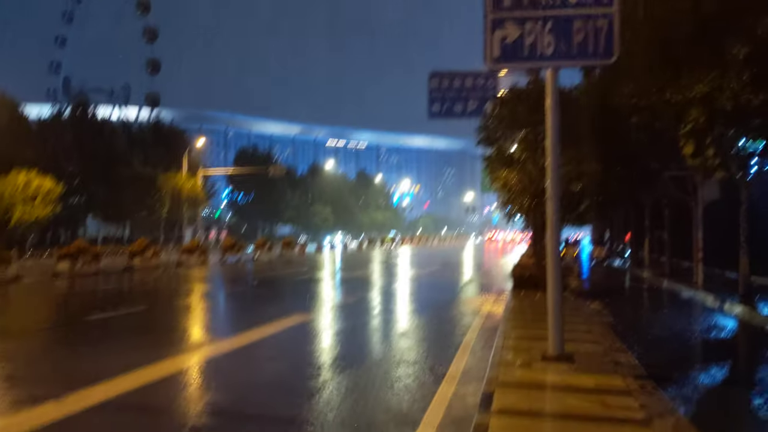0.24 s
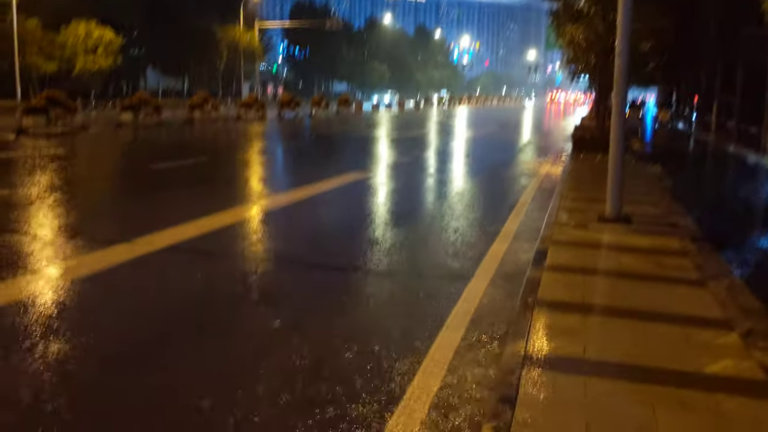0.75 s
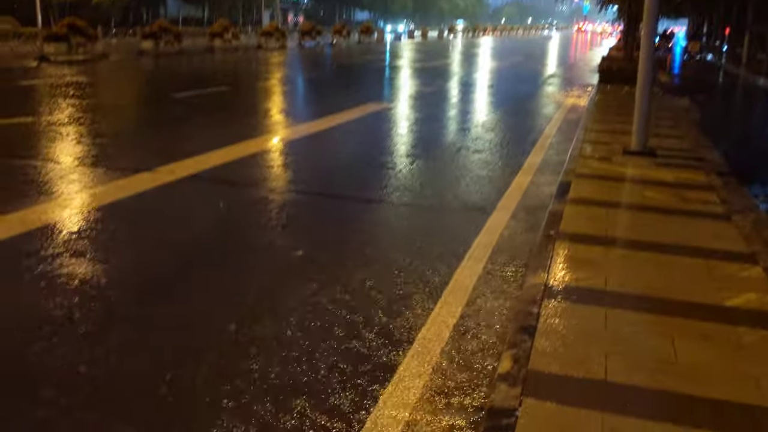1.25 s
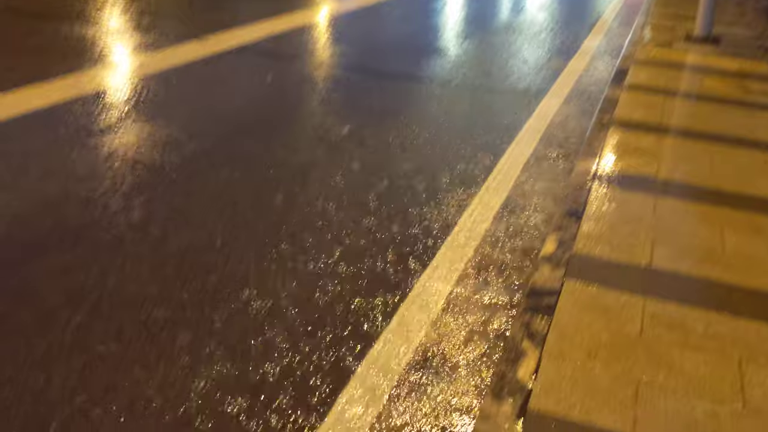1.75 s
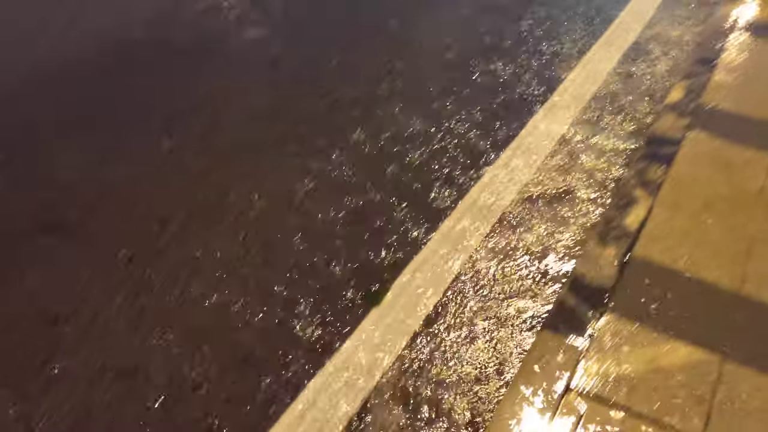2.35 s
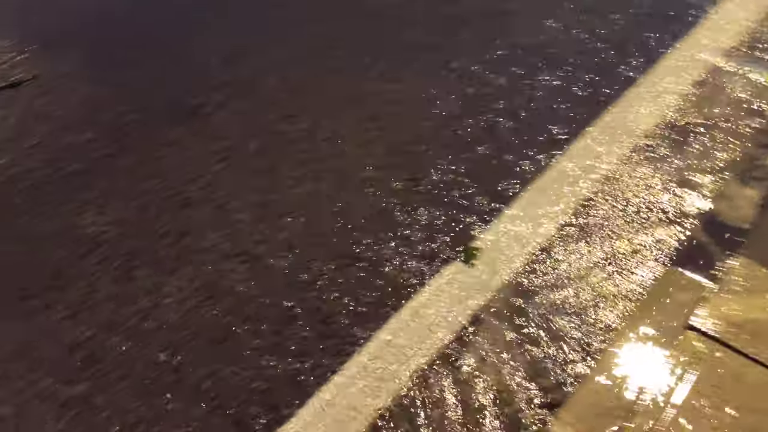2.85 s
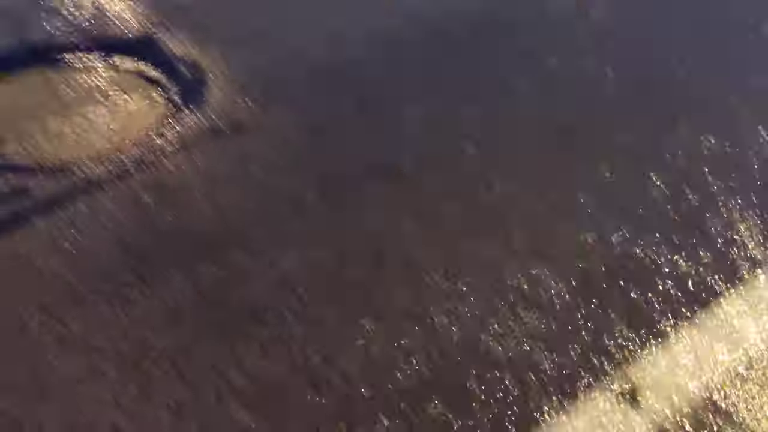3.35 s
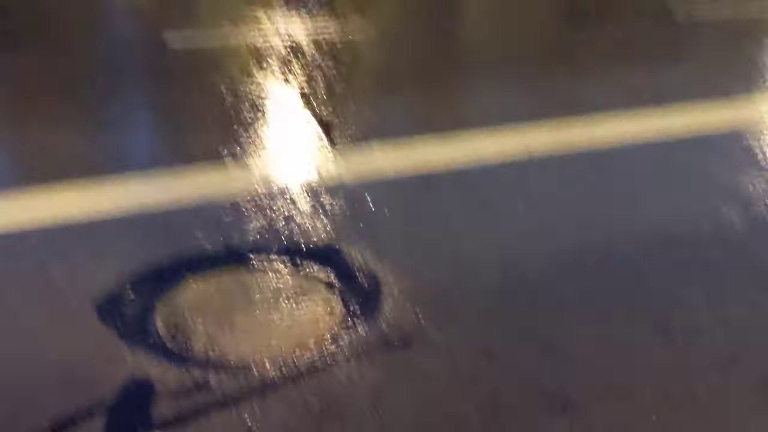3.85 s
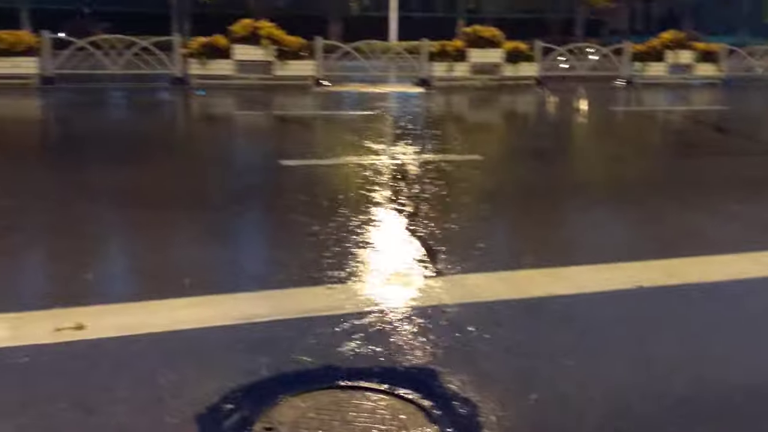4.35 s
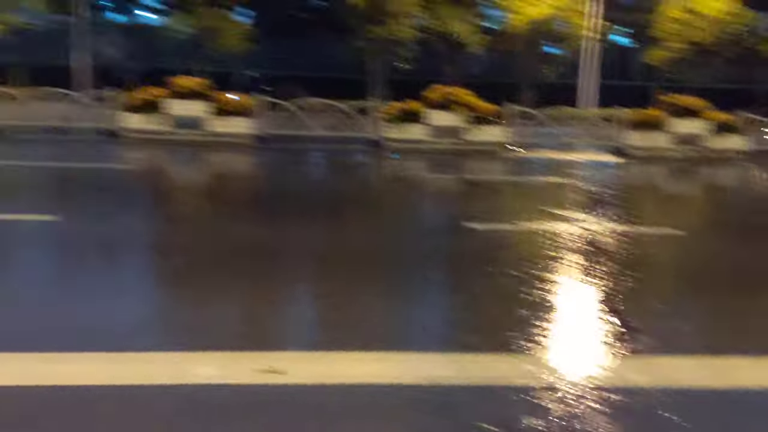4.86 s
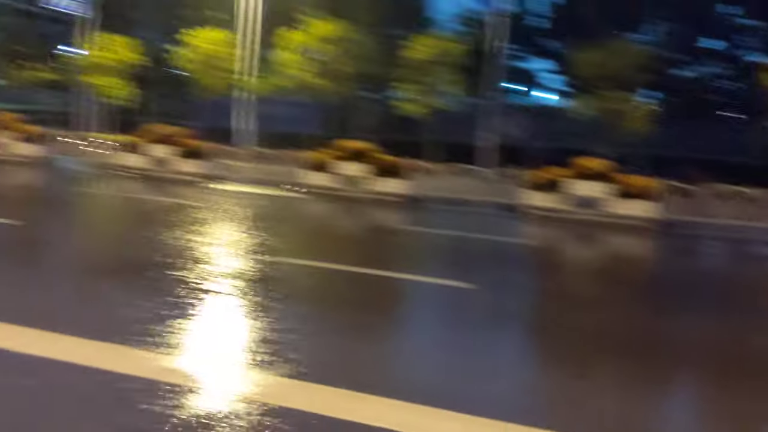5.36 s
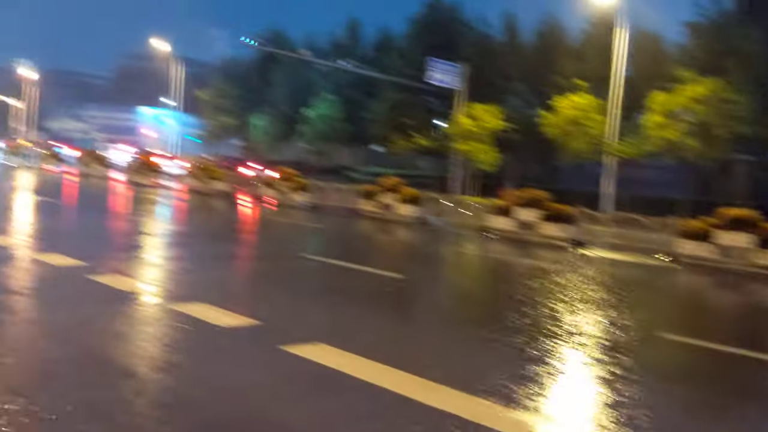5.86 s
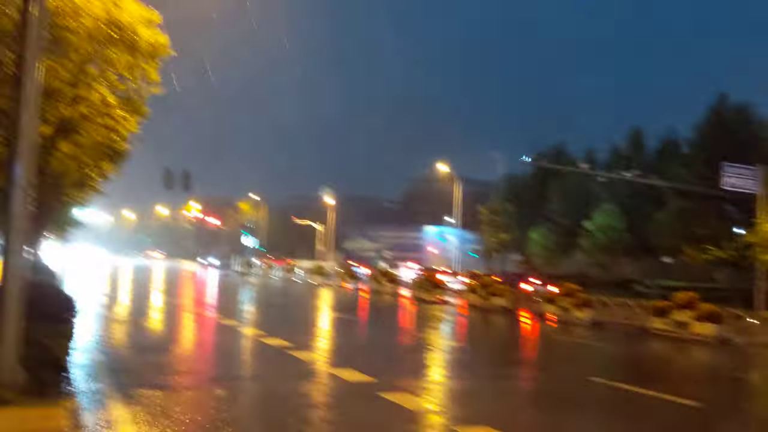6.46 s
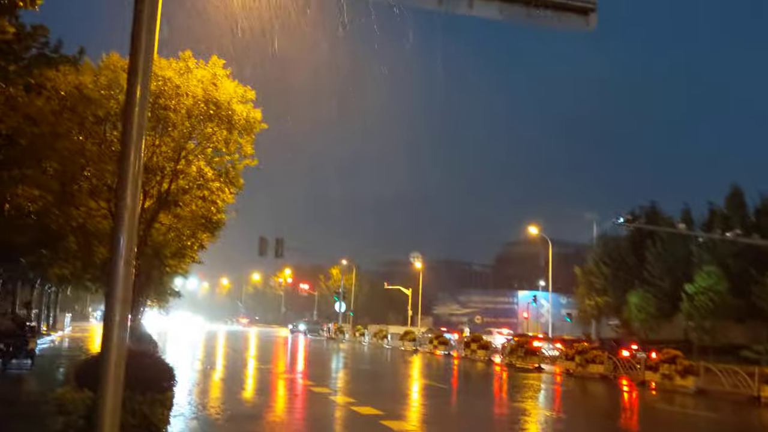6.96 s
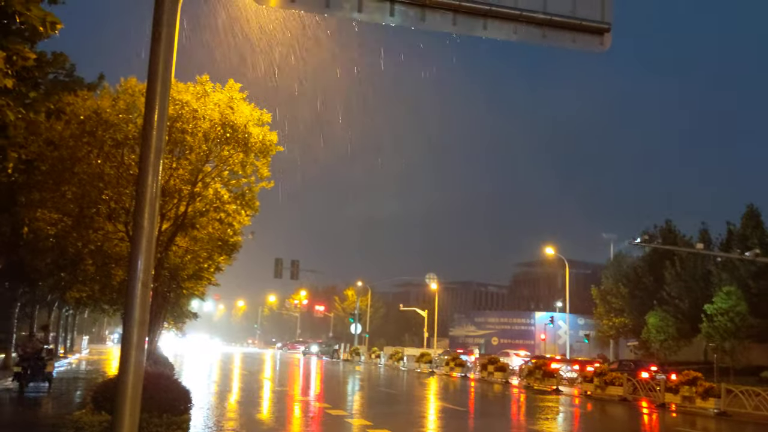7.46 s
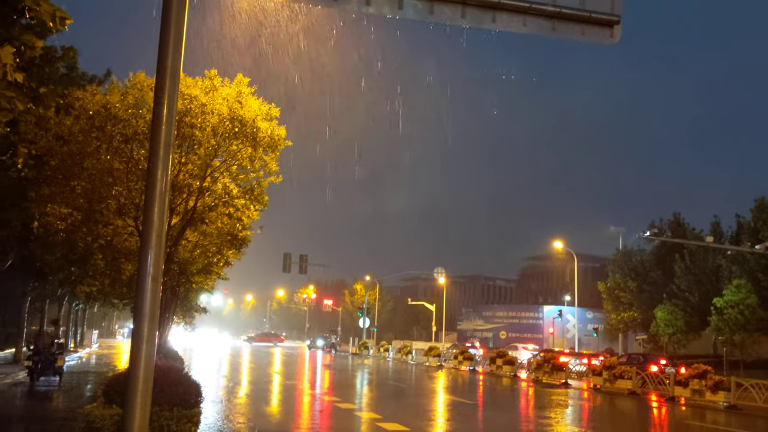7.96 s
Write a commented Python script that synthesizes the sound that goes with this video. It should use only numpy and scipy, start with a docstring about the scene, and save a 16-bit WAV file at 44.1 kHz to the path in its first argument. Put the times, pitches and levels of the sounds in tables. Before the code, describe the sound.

A steady downpour on asphalt, with a dull canopy-like patter and faint far traffic drone. Close drops tick, plop and crack left and right, sparse at first, then dense around three to four seconds. Lumpy low wind buffeting follows at five to six and a half seconds, with a few hard snaps, before calmer, stronger rain hiss. Small exposed stereo microphone, open street.

```python
"""Heavy rain on a wide city street at night, heard on a small two-port microphone, probably under an umbrella.
Countless filtered clicks and noise make the hiss on wet asphalt and the canopy patter; big drops snap
right beside the ports, each a strike, a splash back and a spray that ring a resonance.
Far off, shaped noise drones as traffic. Close in, lumpy low noise is gusts buffeting the microphone
as it swings round, and damped low swings are knocks on its case."""
import sys
import numpy as np
from scipy import signal
from scipy.fft import rfft, irfft, next_fast_len
from scipy.io import wavfile

SR = 44100
rng = np.random.default_rng(int(sys.argv[2]) if len(sys.argv) > 2 else 0)


def pcm_store(signal):
    """Save signal as 16-bit PCM."""
    levels = np.round(np.clip(np.atleast_2d(signal), -1, 1) * 32767)
    wavfile.write(sys.argv[1], SR, levels.astype(np.int16).T)


N = 362943

# Far rumble, probably traffic, that swells and fades:
# (time of the top [s], half-length [s], level before trim [dB])
TRAFFIC_SWELLS = [(.285, 0.029, -42), (0.59, 0.27, -42.5), (1.964, 0.34, -44.5)]
# Tyres of cars coming up the wet street: (time [s], level on the left [dB])
TYRE_LEVEL = [(0, -63), (6.8, -79), (7.7, -48), (8.23, -46.5)]
# Steady air on the ports, freshening as the microphone swings round: (time [s], level before trim [dB])
BREEZE_LEVEL = [(0, -47.5), (1.4, -53), (2.2, -51.5), (4.7, -50.5), (5.1, -44), (6.3, -41), (6.9, -39.5),
                (7.5, -43), (8.23, -42.5)]
# Gusts on the ports: (start of the hold [s], length of the hold [s], level [dB])
GUST_EVENTS = [(5.11, 0.024, -41), (5.188, 0.064, -40.5), (5.573, 0.011, -33), (5.661, 0.017, -35.5),
               (5.774, 0.0099, -38.5), (5.884, 0.061, -29.5), (5.997, 0.055, -28.5), (6.089, 0.047, -29.5),
               (6.186, 0.043, -34.5), (6.275, 0.054, -26), (6.367, 0.068, -25), (6.601, 0.073, -37.5),
               (6.734, 0.011, -33), (7.79, 0.033, -39.5)]
# Dull knocks on the microphone's case:
# (time [s], level before damping [dB], pitch [Hz], time to fall 60 dB [s], left minus right [dB])
CASE_KNOCKS = [(0.65, -20, 39.5, 0.058, 5), (3.7186, 5, 124, 0.01, -29), (3.718, -21, 48, 0.17, -2),
               (4.89, -11.5, 47.4, 0.049, -9), (5.659, -18, 33.4, 0.092, 2)]
# Rain as the microphone turns: (time [s], canopy patter before trim [dB],
# street hiss on the right before trim [dB], left hiss and bright fizzles before trim [dB])
RAIN_LEVELS = [(0.0, -50, -53, -57), (0.5, -45.5, -54, -57), (0.98, -49.5, -53.5, -57),
               (1.44, -49.5, -55, -57), (1.88, -47.5, -52.5, -55), (3.0, -49.5, -57.5, -58),
               (3.67, -48.5, -54.5, -57), (4.12, -48.5, -55.5, -55.5), (4.38, -48.5, -54.5, -57),
               (5.02, -49, -53.5, -55), (5.45, -48.5, -50.5, -51), (7.1, -49, -52, -52.5),
               (7.61, -48.5, -47.5, -48.5), (8.23, -48, -45, -52)]
# How thickly single drops fall near the microphone: (time [s], relative level [dB])
DRIP_LEVEL = [(0, -8), (1.5, 6), (3.3, 9.5), (4.7, 0), (6, -17), (7.3, -7), (8.23, 13)]
# Big close drops:
# (time [s], peak at the louder port [dB], pitch of the snap [Hz], ring Q, left minus right [dB])
CLOSE_DROPS = [(0.212, -22.5, 724, 4.5, 8), (0.6517, -12, 600, 0.53, 13), (.8773, -29, 600, 3.9, 1),
               (1.099, -22.5, 1310, 1.1, 3), (1.178, -15.5, 2830, 1.1, -1), (1.271, -21.5, 3300, 0.82, -2),
               (1.6902, -19, 6800, .7, 6), (1.7619, -16, 704, 0.84, 10), (1.918, -19, 5600, 1.3, 9),
               (2.1514, -25, 566, 2.4, 2), (2.2126, -14, 1280, .45, 8), (2.429, -20.5, 3570, 2.1, -1.5),
               (2.531, -11.5, 895, 0.43, -6), (2.5579, -11, 900, 2.6, 3), (2.613, -16, 900, 0.29, -1),
               (2.6716, -17, 600, 1.1, 7), (2.7217, -18.5, 895, 1.3, 2), (2.937, -19.5, 8900, 4.2, 27),
               (3.0997, -15, 700, 0.29, -11), (3.1178, -18.5, 1200, .4, 7), (3.1514, -15, 1900, 0.6, -3),
               (3.1748, -20, 755, 1.9, 6), (3.2153, -13.5, 700, 0.19, 4.5), (3.27, -18.5, 580, 2.6, 4),
               (3.371, -18, 760, 2.3, 3), (3.3906, -20.5, 850, 2.3, 5), (3.4506, -26, 8000, 1.8, 15),
               (3.53, -18, 825, 1.2, 10), (3.5621, -8, 716, 1.1, -0.5), (3.6635, -18.5, 4600, .7, 4),
               (3.689, -3.5, 1200, 0.41, 16), (3.717, -6, 860, 0.57, 0), (3.7197, -0.5, 830, 0.22, -15),
               (3.733, -13.5, 9500, 1.5, -25), (3.8005, -10.5, 2200, 0.21, -27), (3.81, -4.5, 930, 1.8, 14),
               (3.9132, -16, 8700, 3.3, 16), (3.9985, -4, 3070, 1.6, 24), (4.115, -12, 700, 0.23, -11),
               (4.2271, -17.5, 3330, 3.4, 16), (4.262, -24, 8000, 3.1, 15), (4.4289, -19, 800, 1.7, 5),
               (4.507, -14.5, 700, 0.4, -14), (5.025, -14, 1040, 1.7, -0.5), (5.098, -7.5, 700, 0.38, -5),
               (5.119, -7, 700, .3, -4.5), (5.4285, -4.5, 980, 2.2, 3), (5.4557, -11, 600, .65, -1.5),
               (5.6993, -16, 5100, 3.6, 0), (5.834, -16.5, 3880, 5.5, -13), (5.939, 2.5, 3930, 0.83, -21),
               (5.962, -19, 980, 1.4, 3), (5.969, -11, 950, 0.63, 7), (6.015, -19, 2200, 2.7, 15),
               (6.0502, -19.5, 1100, 0.61, 10), (6.109, -13.5, 900, .55, 3), (6.2788, -14.5, 520, 1.3, 18),
               (6.3131, -1.5, 2060, 5, 9), (6.5036, -5.5, 1260, 6.5, 9), (7.0705, -18.5, 4100, 8.2, -18),
               (7.1295, -16, 4270, 5.2, -3), (8.133, -13, 1300, 0.31, 6), (8.1578, -12.5, 910, 0.45, 8)]

# Colour of each microphone port: (frequency [Hz], gain [dB])
LEFT_PORT_COLOUR = [(200, -7), (450, -8.5), (800, -4), (1120, -11), (1680, 2.7), (2700, -9), (4100, -19.5),
                    (4900, -24), (5700, -18), (6600, -16), (7800, -4.5), (9800, -7.5), (12800, -27),
                    (15500, -28.5)]
RIGHT_PORT_COLOUR = [(200, -27), (430, -19), (830, -7.5), (1180, -16), (1600, -6), (2400, -20), (3200, -5),
                     (4000, -3), (4900, -15.5), (5700, -11), (6700, -29), (7800, -21), (8700, -36),
                     (14500, -30.5)]
# How the two ports hear one field: (frequency [Hz], coherence [0-1], phase lead of the right port [rad])
PORT_COHERENCE = [(59.6, 0.5, 4.5), (188, 1, 0.5), (334, 0, 1.3), (530, 0.69, 2.5), (800, 0.86, 0.31),
                  (944, 1, 1.5), (1250, 0.54, 1.5), (1740, 0.8, -1.4), (2220, 0.07, 5.5), (3330, 1, 0.5)]

# Source spectra, each: (frequency [Hz], relative density [dB])
DRONE_SPECTRUM = [(40, 3), (100, -12), (170, -2), (245, 6.5), (335, 0.5), (420, -12), (900, -10),
                  (2000, -47)]
TYRE_SPECTRUM = [(200, -17), (420, 8.5), (600, 10), (900, -6.5), (1500, -14), (3000, -55)]
WIND_SPECTRUM = [(10, -8.5), (25, -0.5), (60, -8), (130, -9.5), (250, -20.5), (500, -43.5), (1500, -68)]
# Flutter of eddies at the ports, then their sputter
FLUTTER_SPECTRUM = [(50, -13), (130, 3), (290, 1.5), (500, -5.5), (900, -40), (2000, -25.5), (5000, -59)]
SPUTTER_SPECTRUM = [(80, -5), (300, 11.5), (700, 1), (1500, -11), (4000, -58)]
PATTER_SPECTRUM = [(120, -14.5), (300, 5.5), (550, 5), (2000, -2), (3000, -12), (6000, -4), (14000, -56)]
HISS_SPECTRUM = [(700, -19.5), (1800, -25.5), (3000, -3), (4500, 8), (9000, -0.5), (15000, -4.5)]

DRONE_DB = -58  # the rumble between its swells, before trim
GUST_ATTACK_S, GUST_RELEASE_S = 0.013, 0.015  # time constants
# At this strength flutter grows level with the gust; dB of flutter per dB of gust
FLUTTER_ONSET_DB, FLUTTER_GROWTH = -19.5, 1.395
# The water falls back this long after the strike; share by which that varies
SPLASH_BACK_MS, SPLASH_BACK_SCATTER = 0.36, 0.25
LEFT_LAG_MS, LAG_SCATTER_MS = 0.25, 0.24  # a drop usually reaches the left port a little later
SPRAY_FROM_DB, SPRAY_GROWTH = -12.5, 0.73  # a middling drop; dB more spray per dB of a louder drop
STOPBAND_HZ = 16900  # the microphone's top is 60 dB down from here


def from_db(db):
    """Decibels to amplitude gain."""
    return 10 ** (np.asarray(db) / 20)


def rms_one(x):
    """Scale to rms 1 over both ports together."""
    return x / np.sqrt(np.mean(x ** 2) + 1e-20)


def in_time(rows):
    """Each column of a curve, sample by sample."""
    s, *columns = np.transpose(rows)
    return [np.interp(np.arange(N) / SR, s, column) for column in columns]


def in_frequency(rows):
    """Each column of a spectrum, bin by bin on a log frequency axis."""
    hz, *columns = np.transpose(rows)
    bins = np.fft.rfftfreq(next_fast_len(N, True), 1 / SR)
    return [np.interp(np.log(bins + 1), np.log(hz), column) for column in columns]


def coloured(x, spectrum):
    """Causal (minimum-phase) filter with the given spectrum."""
    size = next_fast_len(N, True)
    gain = from_db(in_frequency(spectrum)[0])
    cepstrum = irfft(np.log(gain), size)
    # folding the cepstrum forward in time gives minimum phase
    cepstrum[1:size // 2] *= 2
    cepstrum[size // 2 + 1:] = 0
    response = np.exp(rfft(cepstrum))
    return irfft(rfft(x, size) * response, size)[..., :N]


def drift(per_s):
    """Slow chance: random knots of spread 1, joined by straight lines."""
    knots = rng.standard_normal(4000)
    return np.interp(np.arange(N) / SR * per_s, np.arange(len(knots)), knots)


def decay(t, t60):
    """Exponential fall of 60 dB in t60 seconds."""
    return np.exp(-np.log(1000) * t / t60)


def panned(pan_db):
    """Left and right gains; the louder side is 1."""
    return from_db([[min(pan_db, 0)], [min(-pan_db, 0)]])


def paired(x):
    """Two unrelated signals become one sound field picked up at two nearby ports."""
    size = next_fast_len(N, True)
    alike, lead = in_frequency(PORT_COHERENCE)
    alike = np.clip(alike, 0, 0.99)
    left, own = rfft(x, size)
    right = alike * np.exp(1j * lead) * left + np.sqrt(1 - alike ** 2) * own
    return irfft([left, right], size)[:, :N]


def through_ports(x, depth=1):
    """Each port adds its own cavity resonances; depth under 1 weakens them."""
    ports = (LEFT_PORT_COLOUR, RIGHT_PORT_COLOUR)
    return np.array([coloured(side, np.array(port) * [1, depth]) for side, port in zip(x, ports)])


def impacts(per_s, spread_db, largest_db):
    """Random clicks at each port, sizes scattered in dB up to a cap; rms 1."""
    sizes = from_db(np.minimum(spread_db * rng.exponential(1, (2, N)), largest_db))
    struck = rng.random((2, N)) < per_s / SR
    return rms_one(struck * sizes * rng.choice([-1, 1], (2, N)))


def snap(x, hz, q):
    """A resonance struck by x; a low Q makes it broad and short."""
    q = max(q, hz / (0.4 * SR))  # limits the bandwidth
    return signal.lfilter(*signal.iirpeak(hz, q, fs=SR), x)


def splashes(per_s, low_hz, high_hz, q, spread_db, largest_db, count):
    """Impacts dealt out to snaps of different pitch; rms 1."""
    clicks = impacts(per_s, spread_db, largest_db)
    dealt = rng.integers(0, count, N)
    total = np.zeros((2, N))
    for k, hz in enumerate(np.geomspace(low_hz, high_hz, count)):
        # the root evens out the energy of high and low pitches
        total += snap(clicks * (dealt == k), hz, q) / np.sqrt(hz)
    return rms_one(total)


def traffic(waver_db=2.5):
    """Engines far down the street blur into a wavering drone; tyres add a soft roar."""
    t = np.arange(N) / SR
    level = from_db(DRONE_DB)
    for s, half_s, db in TRAFFIC_SWELLS:
        level = level + from_db(db) / (1 + ((t - s) / half_s) ** 2) ** 2
    drone = rms_one(coloured(paired(rng.standard_normal((2, N))), DRONE_SPECTRUM))
    drone = drone * from_db(waver_db * drift(25))
    roar = rms_one(coloured(paired(rng.standard_normal((2, N))), TYRE_SPECTRUM))
    tyre_db, = in_time(TYRE_LEVEL)
    return panned(11.7) * (from_db(2.0) * level * drone + from_db(tyre_db) * roar)


def gust(start_s, length_s):
    """Attack, hold and release of one gust; height 1."""
    t = np.arange(N) / SR - start_s
    rise = np.minimum(t, 0) / GUST_ATTACK_S
    fall = np.maximum(t - length_s, 0) / GUST_RELEASE_S
    return np.exp(rise - fall)


def eddies(spectrum, shared, lumpy_db, per_s):
    """Lumpy turbulence, partly common to both ports; a lump never grows without bound."""
    air = rng.standard_normal((2, N)) + shared * rng.standard_normal(N)
    own_drift = np.array([drift(per_s), drift(per_s)])
    lumps = 2 * np.tanh((drift(per_s) + own_drift / 2) / 2)
    return rms_one(coloured(air, spectrum) * from_db(lumpy_db * lumps))


def wind(breeze_db=2.0, flutter_db=0.5, sputter_db=-4.5, breeze_flutter_db=-8.0, sputter_shared=0.78):
    """Air rumbles on the ports; the harder it blows, the more its small eddies flutter and sputter."""
    light = from_db(in_time(BREEZE_LEVEL)[0])
    gusts = sum(from_db(db) * gust(s, length_s) for s, length_s, db in GUST_EVENTS)
    push = np.hypot(from_db(breeze_db) * light, gusts)
    onset = from_db(FLUTTER_ONSET_DB)
    strength = np.hypot(from_db(breeze_flutter_db) * light, gusts)
    turbulence = onset * (strength / onset) ** FLUTTER_GROWTH
    rumble = push * eddies(WIND_SPECTRUM, shared=2.06, lumpy_db=2.5, per_s=22)
    flutter = from_db(flutter_db) * eddies(FLUTTER_SPECTRUM, shared=3.0, lumpy_db=9.0, per_s=70)
    pops = impacts(per_s=200, spread_db=5.0, largest_db=16.5)
    pops = pops + sputter_shared * pops[::-1]  # each port also hears the other's pops
    sputter = from_db(sputter_db) * rms_one(coloured(pops, SPUTTER_SPECTRUM))
    return rumble + turbulence * (flutter + sputter)


def knocks(size=8192):
    """A knock on the case is a heavily damped low swing."""
    out, t = np.zeros((2, N + size)), np.arange(size) / SR
    for s, level_db, hz, t60, pan_db in CASE_KNOCKS:
        at = round(s * SR)
        swing = np.sin(2 * np.pi * hz * t) * decay(t, t60)
        out[:, at:at + size] += panned(pan_db) * from_db(level_db) * swing
    return out[:, :N]


def street_hiss(waver_db=0.87):
    """Near splashes tick on the water film; far ones merge into a hiss; the level wavers slightly at random."""
    ticks = splashes(per_s=2200, low_hz=3380, high_hz=12300, q=0.45, spread_db=5.5, largest_db=32, count=8)
    field = from_db(-5.0) * ticks + rng.standard_normal((2, N))
    hiss = rms_one(through_ports(coloured(field, HISS_SPECTRUM)))
    return hiss * from_db(waver_db * drift(22))


def bright_fizzles(per_s=32, t60=0.03, fizzle_db=-3.0):
    """Short bright bursts of noise around 9.5 kHz, at random times."""
    strength = np.abs(impacts(per_s, spread_db=0.5, largest_db=6))
    envelope = signal.lfilter([1], [1, -from_db(-60 / (t60 * SR))], strength)
    bursts = snap(envelope * rng.standard_normal((2, N)), hz=9500, q=0.86)
    return from_db(fizzle_db) * rms_one(through_ports(bursts, 0.82))


def canopy_patter():
    """Soft taps overhead, on a wash of drops too many to tell apart."""
    taps = splashes(per_s=700, low_hz=560, high_hz=3100, q=1.0, spread_db=1.0, largest_db=20, count=6)
    field = paired(taps + from_db(10.5) * rng.standard_normal((2, N)))
    return rms_one(through_ports(coloured(field, PATTER_SPECTRUM)))


def stray_drops():
    """A few dozen drops a second land near enough to be heard singly: soft plops and bright ticks."""
    plops = splashes(per_s=11, low_hz=600, high_hz=2800, q=0.86, spread_db=5.0, largest_db=7.5, count=6)
    ticks = splashes(per_s=7.4, low_hz=2950, high_hz=11500, q=4.2, spread_db=24.0, largest_db=19, count=7)
    drops = from_db(-55.0) * plops + from_db(-59.0) * ticks
    return from_db(in_time(DRIP_LEVEL)[0]) * through_ports(drops, 0.81)


def big_drops(port_depth=0.74, splash_back=0.38, softness=11.0, spray_db=-27.0, spray_t60=0.0098, size=1024):
    """A close drop strikes, splashes back within about a millisecond and scatters a little spray."""
    out, t = np.zeros((2, N + size)), np.arange(size) / SR
    clicks = np.tile(signal.unit_impulse(N), (2, 1))
    port_ring = through_ports(clicks, port_depth)[:, :size]
    chances = rng.standard_normal((len(CLOSE_DROPS), 2))
    for (s, peak_db, hz, q, pan_db), (back, lag) in zip(CLOSE_DROPS, chances):
        spray = from_db(spray_db + SPRAY_GROWTH * (peak_db - SPRAY_FROM_DB))
        force = spray * rng.standard_normal(size) * decay(t, spray_t60)
        force[0] += 1  # the strike
        back_ms = abs(SPLASH_BACK_MS * (1 + SPLASH_BACK_SCATTER * back))
        force[round(back_ms * SR / 1000)] += splash_back
        # a low-pitched drop lands on something soft, which dulls its top
        top_hz = min(softness * hz, 0.4 * SR)
        force = signal.lfilter(*signal.butter(1, top_hz, fs=SR), force)
        force = snap(force, hz, q)
        hit = signal.fftconvolve(port_ring, force[None])[:, :size]
        hit = hit / np.abs(hit).max(axis=1, keepdims=True)
        hit = from_db(peak_db) * panned(pan_db) * hit
        for side, late_ms in enumerate((LEFT_LAG_MS + LAG_SCATTER_MS * lag, 0)):
            at = round((s + late_ms / 1000) * SR)
            out[side, at:at + size] += hit[side]
    return out[:, :N]


def scene():
    """Traffic and wind behind rain, far and near."""
    patter_db, right_db, left_db = in_time(RAIN_LEVELS)
    hiss = from_db([left_db + 8.0, right_db + 6.0]) * street_hiss()
    fizzles = from_db(left_db) * bright_fizzles()
    patter = from_db(patter_db + 5.0) * canopy_patter()
    background = traffic() + wind() + knocks()
    return background + hiss + fizzles + patter + stray_drops() + big_drops()


def record(dry):
    """The highest peaks are rounded off and the top is cut."""
    rounded = dry / (1 + (dry / 0.75) ** 4) ** 0.25
    return signal.sosfilt(signal.cheby2(16, 60, STOPBAND_HZ, fs=SR, output="sos"), rounded)


dry = scene()
out = record(dry)
pcm_store(out)
```